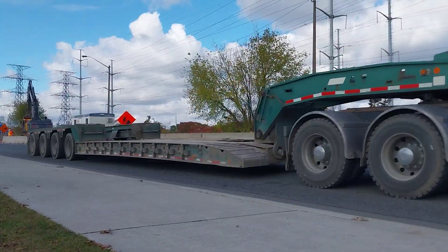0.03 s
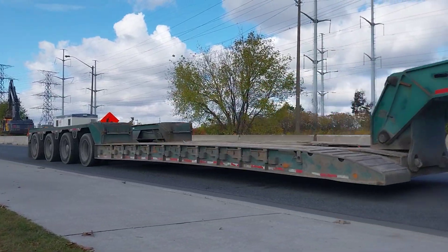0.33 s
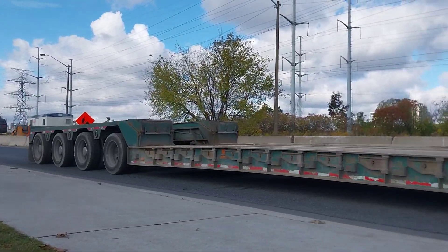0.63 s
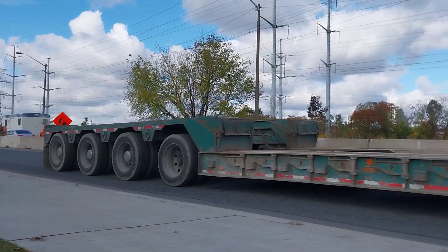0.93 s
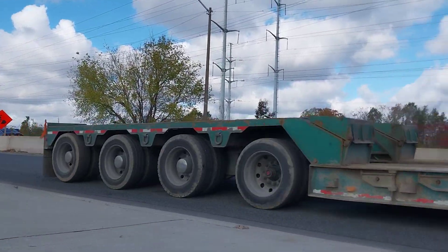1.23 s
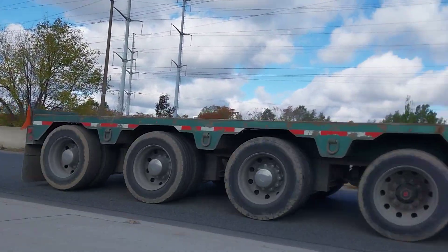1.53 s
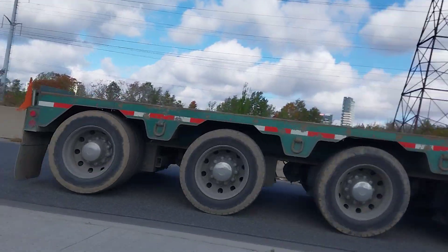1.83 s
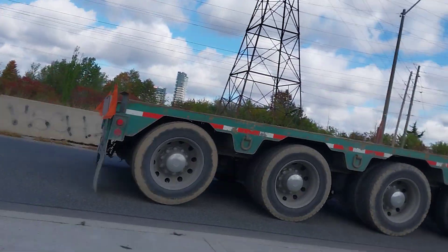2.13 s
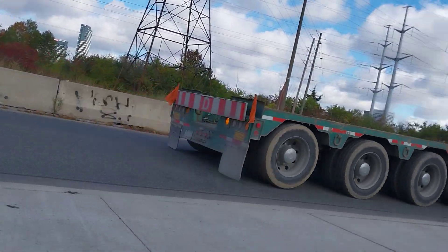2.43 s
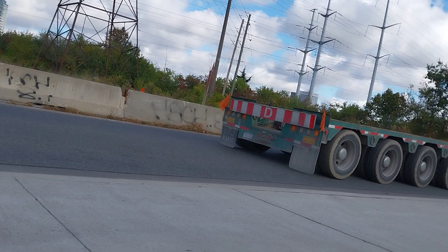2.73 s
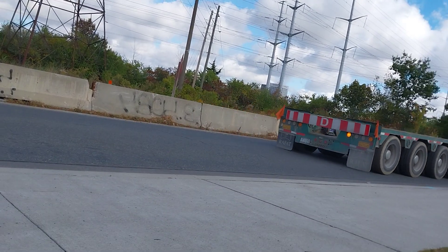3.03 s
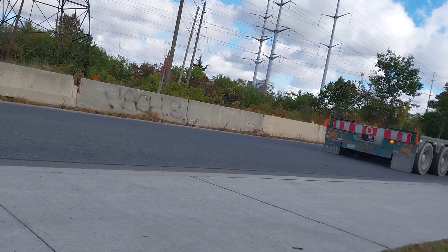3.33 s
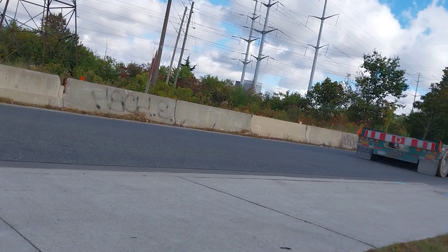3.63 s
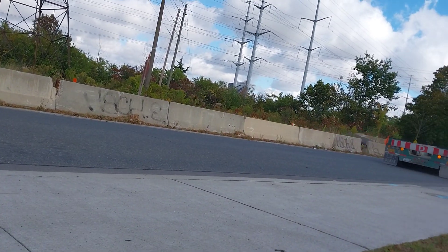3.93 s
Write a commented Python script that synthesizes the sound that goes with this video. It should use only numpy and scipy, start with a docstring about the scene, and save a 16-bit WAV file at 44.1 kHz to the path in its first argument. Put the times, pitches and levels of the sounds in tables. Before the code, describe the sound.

A diesel truck hauls a long trailer past a roadside microphone. Tyre hum, a high whine and engine clatter come first, then loose steel knocks as the trailer rolls by. The sound dulls as it moves off, still throbbing.

```python
"""A diesel tractor pulls a long low-bed trailer past a kerb, a few metres away, and accelerates off.
First the lugged drive tyres hum by, the turbo whines and the engine clatters over a throbbing exhaust.
From about 1 s a rush swells and loose steel knocks; the trailer axles then roll past, humming.
Rumble, squeaks and ticks of grit run through the pass. By 4 s mostly exhaust and rumble remain."""
import sys
import numpy as np
from scipy import signal
from scipy.fft import rfft, irfft
from scipy.io import wavfile
from scipy.ndimage import uniform_filter1d, map_coordinates

SR = 44100
rng = np.random.default_rng(int(sys.argv[2]) if len(sys.argv) > 2 else 0)


def generate_wav(sig):
    """Save sig (samples, or channels by samples) to the path in sys.argv[1] as 16-bit PCM at SR."""
    pcm = np.round(np.clip(np.atleast_2d(sig).T, -1, 1) * 32767).astype(np.int16)
    wavfile.write(sys.argv[1], SR, pcm)


N = 176400
TIME_S, BIN_HZ = np.arange(N) / SR, np.fft.rfftfreq(N, 1 / SR)

# Table levels are relative; the functions add trims.
# stones under the tyres (time [s], level [dB], centre [Hz])
GRIT_SNAPS = [(0.276, -34, 4700), (.597, -38, 6000), (1.432, -45, 9000), (2.3, -46, 4400),
              (3.411, -55, 13000), (3.495, -56, 12000), (3.56, -55, 9400), (3.661, -49, 4478),
              (3.772, -58, 12900)]
# small metal piece (centre [Hz], width [Hz], level [dB])
CLINK_MODES = [(3550, 550, -5), (4750, 350, 0), (6500, 2200, -9)]
# rubbing steel (time [s], pitch [Hz], level [dB], half-length [s])
SQUEAKS = [(.82, 3630, -37, .03), (1.23, 4200, -46, .025), (1.495, 4100, -43, .015), (1.98, 3780, -47, .04)]
# loose steel (time [s], level [dB], decay [s], thud re knock [dB])
KNOCKS = [(1.211, -37, .01, -6), (1.249, -28.5, .011, -1), (1.316, -29, .024, 1), (1.432, -38, .02, -6),
          (1.558, -35, .01, -3), (1.589, -31, .014, 0), (1.66, -30.5, .022, -3), (2.639, -34, .036, 4),
          (2.773, -40, .012, -6), (2.793, -37, .015, -6), (2.82, -36, .034, -8)]
# scrape of a knock (frequency [Hz], density [dB])
SCRAPE_SPECTRUM = [(200, -22), (600, -3), (1000, -1.5), (1300, 15), (1700, 5.5), (2200, 2.5), (3000, -4),
                   (4000, -10), (6000, -15), (9000, -23.5), (15000, -34)]
# ring of the loose steel (centre [Hz], width [Hz], level [dB])
STEEL_MODES = [(1080, 40, -7), (1235, 45, 0), (1780, 70, -4), (2450, 120, -12), (2830, 120, -13)]
# lower rushing band (time [s], centre [Hz], level [dB])
RUSH_TRACK = [(0, 2000, -75), (.7, 2220, -45), (1, 2542, -39.5), (1.6, 2554, -44), (2.2, 2487, -62.5),
              (4, 2450, -82)]
# rolling noise (time [s], rumble [dB], roar [dB])
ROLLING_LEVELS = [(0, -23.5, -24), (0.45, -22, -27), (0.85, -21, -25.5), (1.1, -22.5, -27.5),
                  (1.6, -21.5, -26.5), (2.0, -22.5, -30), (2.25, -21.5, -31), (2.58, -26, -32.5),
                  (2.8, -23, -34), (3.1, -25.5, -37), (3.5, -27, -38), (4, -24.5, -39)]
# trailer rumble (frequency [Hz], density [dB])
RUMBLE_SPECTRUM = [(20, -40), (32, -23), (47, -14), (65, -5.5), (110, 2), (160, -3.5), (220, -3.5),
                   (285, -3), (350, -41), (600, -58.5)]
# tyre roar (frequency [Hz], density [dB])
ROAR_SPECTRUM = [(180, -12.5), (300, -1.5), (385, -1), (440, -4), (520, -3.5), (650, -8), (810, -8),
                 (960, -15), (1300, -15.5), (3000, -79)]
# trailer tyre hum (time [s], pitch [Hz], level [dB])
HUM_TRACK = [(0, 220, -29), (1.2, 218, -37), (1.9, 208, -25), (2.3, 198, -33.5), (2.6, 180, -24.5),
             (3, 185, -41.5), (4, 195, -39)]
# drive tyre tread (time [s], pitch [Hz], level [dB])
TREAD_TRACK = [(0, 129, -21), (.13, 128, -18), (.3, 127, -21), (.42, 126, -30), (.52, 125, -22),
               (.66, 124.5, -22.5), (.82, 124.5, -17.5), (.93, 124, -33), (1.4, 123, -70)]
# tread partials (harmonic, level [dB])
TREAD_HARMONICS = [(1, -18.5), (2, -0.5), (3, -17)]
# turbo (time [s], reference pitch [Hz], compressor level [dB])
TURBO_TRACK = [(0, 7620, -41.5), (.1, 7330, -41), (.22, 7050, -45), (.38, 6880, -46), (.47, 6830, -39.5),
               (.54, 6850, -47), (.6, 6870, -44), (.72, 6950, -50), (.85, 7700, -54), (.98, 8500, -56),
               (1.16, 7830, -54), (1.47, 7500, -53), (1.78, 6930, -56), (1.94, 6760, -48),
               (2.17, 6620, -63), (2.9, 6740, -66), (3.01, 6720, -51), (3.09, 6700, -63), (3.33, 6650, -49),
               (3.45, 6600, -72), (3.85, 6350, -71), (4, 6220, -57)]
# turbine blade tone (time [s], level [dB])
TURBINE_LEVELS = [(0, -44.5), (.2, -46), (.3, -45), (.4, -43), (.62, -50.5), (.8, -45), (.89, -48),
                  (.96, -46), (1.06, -48), (1.14, -48), (1.4, -50), (1.65, -52.5), (1.8, -68), (2.05, -72),
                  (2.18, -58), (2.35, -79), (4, -78)]
# clatter and hiss (time [s], mids [dB], treble [dB], top [dB])
CLATTER_LEVELS = [(0.0, -35, -39, -40.5), (0.3, -35.5, -40, -41), (0.48, -35.5, -41, -44.5),
                  (0.86, -33, -38.5, -47.5), (0.97, -34, -38.5, -47), (1.08, -36.5, -46.5, -50),
                  (1.24, -37, -42.5, -50.5), (1.5, -39.5, -44, -53), (1.69, -41, -50, -54),
                  (1.95, -46, -47.5, -55.5), (2.15, -44.5, -51, -59), (2.34, -47, -52, -59.5),
                  (2.82, -48, -55, -64), (3.41, -50, -54, -64), (4.0, -48.5, -57, -73)]
# its three bands (frequency [Hz], density [dB])
MIDS_SPECTRUM = [(500, -21), (900, 9), (1100, 2.5), (1350, 6), (1650, 0.5), (2000, 2), (2500, .5),
                 (2900, -3), (3600, -32)]
TREBLE_SPECTRUM = [(2300, -12), (2950, 5), (3400, 4), (3750, 2.5), (4300, -2), (4800, 0), (5600, -2),
                   (6400, -6.5), (7400, -5), (8400, -25), (11000, -52.5)]
TOP_SPECTRUM = [(6000, -28), (7800, 5), (8700, 0), (9700, 2.5), (11000, 7), (12500, 4), (13800, 4.5),
                (15500, -4)]
# engine speed (time [s], fifth-order pitch [Hz])
ENGINE_PITCH = [(0, 97.76), (0.7, 99.7), (1.4, 101.5), (2.35, 104.2), (3, 105.3), (3.65, 106.3), (4, 105.3)]
# booming exhaust lines (time [s], fifth order [dB], fourth order [dB])
BOOM_LEVELS = [(0, -24, -24), (0.22, -35, -32.5), (0.55, -27, -25), (0.75, -28, -28), (1.1, -20.5, -21.5),
               (1.55, -19.5, -26.5), (2.3, -20.5, -27.5), (2.65, -20, -25.5), (3.25, -19, -28),
               (3.55, -23.5, -21), (4, -20.5, -25.5)]
# weaker exhaust lines (order, level re fifth [dB])
WEAK_ORDERS = [(2.5, -23), (6, -18.5), (7, -13), (9, -18.5), (9.5, -18), (12, -13)]
# direction of each vehicle (time [s], nominal left-channel lag [s])
TRACTOR_LAG = [(0, .00053), (.35, .000545), (1.4, .0005), (1.95, .00055), (2.5, .00047), (3, .00049),
               (4, .0005)]
TRAILER_LAG = [(0, .0005), (1.15, .00048), (1.3, .0002), (1.45, .00042), (1.9, .00042), (2.3, .00031),
               (3, .00029), (4, .00035)]
# scatter off road and barrier (frequency [Hz], gain [dB])
SCATTER_RESPONSE = [(30, -13), (100, -23), (300, -19), (600, -13), (1200, -8.5), (2500, -9.5), (5000, -6.5),
                    (14000, -3.5)]


def undb(db):
    """Decibels to gain."""
    return 10 ** (np.asarray(db) / 20)


def unit(x):
    """Scale to rms 1."""
    return x / np.sqrt(np.mean(x ** 2))


def curve(table, column=1):
    """One column of a time table at every sample."""
    rows = np.array(table, float)
    return np.interp(TIME_S, rows[:, 0], rows[:, column])


def colour(x, spectrum):
    """Filter by (frequency [Hz], gain [dB]) points."""
    hz, db = np.array(spectrum, float).T
    return irfft(rfft(x) * undb(np.interp(np.log(BIN_HZ + 1), np.log(hz), db)), N)


def noise(spectrum):
    """Coloured noise, rms 1."""
    return unit(colour(rng.standard_normal(N), spectrum))


def walk(hz):
    """Smooth random motion up to about hz, rms 1."""
    return unit(irfft(rfft(rng.standard_normal(N)) / (1 + (BIN_HZ / hz) ** 2) ** 2, N))


def tone(hz, waver_db, wander_rad):
    """Sine with wavering level and phase, rms 1."""
    phase = 2 * np.pi * (np.cumsum(hz) / SR + rng.random())
    return unit(np.sin(phase + wander_rad * walk(7.6)) * undb(waver_db * walk(4.8)))


def band(hz, width_hz):
    """Noise band on a steady or moving pitch, rms 1."""
    phase = 2 * np.pi * np.cumsum(np.full(N, hz)) / SR
    return unit(walk(width_hz) * np.sin(phase) + walk(width_hz) * np.cos(phase))


def resonances(modes):
    """Sum of noise bands, rms 1."""
    return unit(sum(undb(db) * band(hz, width_hz) for hz, width_hz, db in modes))


def swell(peak_s, spread_s):
    """Gaussian envelope."""
    return np.exp(-((TIME_S - peak_s) / spread_s) ** 2)


def strike(peak_s, rise_s, decay_s):
    """Envelope of a blow: linear rise, exponential fall."""
    age_s = TIME_S - peak_s
    return np.clip(age_s / rise_s + 1, 0, 1) * np.exp(-np.maximum(age_s, 0) / decay_s)


def grit(decay_s=0.0087, width_oct=0.38):
    """Small stones snap with a brief bright ring."""
    out = np.zeros(N)
    for at_s, db, hz in GRIT_SNAPS:
        offset_oct = np.log2((BIN_HZ + 1) / hz)
        ring = unit(irfft(rfft(rng.standard_normal(N)) / (1 + (offset_oct / width_oct) ** 2), N))
        out += undb(db) * ring * (TIME_S >= at_s) * np.exp(-np.abs(TIME_S - at_s) / decay_s)
    return out


def clink():
    """A small piece of metal strikes the frame."""
    return undb(-40) * strike(peak_s=2.978, rise_s=.005, decay_s=.007) * resonances(CLINK_MODES)


def squeaks():
    """Steel rubs on steel: thin tones swell and die."""
    return sum(undb(db) * swell(at_s, spread_s) * band(hz, width_hz=75)
               for at_s, hz, db, spread_s in SQUEAKS)


def rattles(rise_s=.007, ring_db=-5, scrape_db=1):
    """Loose steel knocks in clusters: each knock scrapes, thuds in the deck and rings on."""
    scrape, thud, ring = np.zeros((3, N))
    for at_s, db, decay_s, thud_db in KNOCKS:
        knock = undb(db) * strike(at_s, rise_s, decay_s)
        scrape += knock
        thud += undb(thud_db) * knock
        ring = np.hypot(ring, undb(db + ring_db) * strike(at_s, rise_s, decay_s=.045))
    contact = undb(scrape_db) * scrape * noise(SCRAPE_SPECTRUM) + thud * band(659, width_hz=320)
    roughness = unit(undb(2 * walk(132.5)))
    return roughness * contact + ring * resonances(STEEL_MODES)


def rush(width_hz=380, upper_ratio=1.6, upper_db=-8):
    """Two hollow noise bands rise and swell, then fade."""
    hz = curve(RUSH_TRACK)
    bands = band(hz, width_hz) + undb(upper_db) * band(hz * upper_ratio, width_hz)
    return undb(curve(RUSH_TRACK, 2)) * bands


def rolling():
    """The trailer rumbles; its tyres roar and hum on asphalt, brighter while the axles are near."""
    axles_near = swell(peak_s=2.36, spread_s=1.44)
    roar = noise(ROAR_SPECTRUM) + axles_near * undb(-5) * band(730, width_hz=260)
    hum = undb(curve(HUM_TRACK, 2)) * band(curve(HUM_TRACK), width_hz=51)
    # hiss thrown back behind the last axle
    wake = undb(-44.5) * swell(peak_s=2.87, spread_s=0.49) * band(1128, width_hz=490)
    rumble = undb(curve(ROLLING_LEVELS) - 2.5) * noise(RUMBLE_SPECTRUM)
    roar_db = curve(ROLLING_LEVELS, 2) - 1 + 0.85 * walk(11.5)
    return rumble + undb(roar_db) * roar + hum + wake


def drive_tyres(rough_db=2.2):
    """Tread lugs hum unevenly, sinking in pitch as they pass."""
    hz = curve(TREAD_TRACK)
    lugs = sum(undb(db) * tone(k * hz, waver_db=0, wander_rad=0.034) for k, db in TREAD_HARMONICS)
    roughness = unit(undb(rough_db * walk(58)))
    return undb(curve(TREAD_TRACK, 2) - 1.5) * roughness * lugs


def turbo(wobble=.003, flutter_db=2.4, breathy_s=1.03, spread_s=.4):
    """Compressor and turbine blades whine on one wavering shaft, breathy near the top pitch."""
    hz = uniform_filter1d(curve(TURBO_TRACK), size=3000) * (1 + wobble * walk(18.6))
    breathy = undb(6) / (1 + ((TIME_S - breathy_s) / spread_s) ** 2)

    def blades(ratio):
        flutter = unit(undb(flutter_db * walk(30)))
        whine = band(hz * ratio, width_hz=70)
        skirt = band(hz * ratio, width_hz=370 * ratio)
        return flutter * (whine + breathy * skirt)

    compressor = undb(curve(TURBO_TRACK, 2)) * blades(ratio=0.99)
    turbine = undb(curve(TURBINE_LEVELS)) * blades(ratio=11 / 7)
    return (compressor + turbine) / np.hypot(1, breathy)


def clatter(cycle_hz, firing_order=4, pulse_depth=0.04):
    """Engine noise and road hiss flicker, pulse faintly with the firings and dull with distance."""
    firing = np.cos(2 * np.pi * np.cumsum(cycle_hz * firing_order) / SR)
    pulsing = unit(np.exp(pulse_depth * firing) * undb(1.38 * walk(27)))
    mids = undb(curve(CLATTER_LEVELS) + 1.5) * noise(MIDS_SPECTRUM)
    treble = undb(curve(CLATTER_LEVELS, 2) + 1.5 + 1.54 * walk(20)) * noise(TREBLE_SPECTRUM)
    top = undb(curve(CLATTER_LEVELS, 3) - 1.5) * noise(TOP_SPECTRUM)
    return pulsing * (mids + treble + top)


def exhaust(cycle_hz):
    """Fourth and fifth orders beat into a throb; weaker, rougher orders surround them."""
    fifth_gain = undb(curve(BOOM_LEVELS) - 1.5)
    fourth_gain = undb(curve(BOOM_LEVELS, 2) - 2)
    fifth = tone(5 * cycle_hz, waver_db=0.5, wander_rad=0.48)
    fourth = tone(4 * cycle_hz, waver_db=0.5, wander_rad=0.86)
    weak = sum(undb(db) * tone(k * cycle_hz, waver_db=4.5, wander_rad=0.64) for k, db in WEAK_ORDERS)
    return fifth_gain * (fifth + weak) + fourth_gain * fourth


def trailer():
    """Axles and steel."""
    return rolling() + rattles() + squeaks() + clink() + grit()


def tractor():
    """All sound from the tractor's direction."""
    cycle_hz = curve(ENGINE_PITCH) / 5
    return exhaust(cycle_hz) + drive_tyres() + turbo() + clatter(cycle_hz) + rush()


def stereo(source, lag_table, bass_hz=740, balance_db=1):
    """Left lags by direction, less in the bass; road and barrier scatter differs per channel."""
    def delay(x, lag_share):
        positions = np.arange(N) - lag_share * curve(lag_table) * SR
        return map_coordinates(x, [positions], order=4, mode="mirror")

    direct = source()
    scattered = colour(source(), SCATTER_RESPONSE)  # independent draw
    left, right = direct + scattered, direct - scattered
    bass = signal.sosfiltfilt(signal.butter(4, bass_hz, fs=SR, output="sos"), left)
    left = delay(bass, lag_share=0.73) + delay(left - bass, lag_share=0.98)
    return np.array([left * undb(balance_db / 2), right * undb(-balance_db / 2)])


def scene():
    """Tractor and trailer, each from its own direction."""
    return stereo(tractor, TRACTOR_LAG) + stereo(trailer, TRAILER_LAG)


def record(dry):
    """Steep low-pass at 15.7 kHz."""
    return signal.sosfilt(signal.ellip(10, .2, 80, 15700, fs=SR, output="sos"), dry)


dry = scene()
out = record(dry)
generate_wav(out)
```